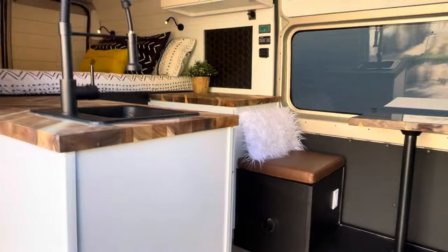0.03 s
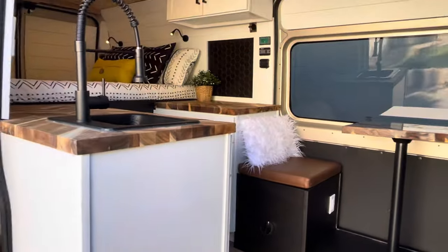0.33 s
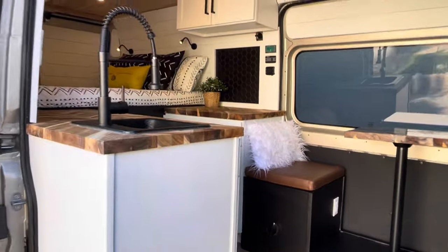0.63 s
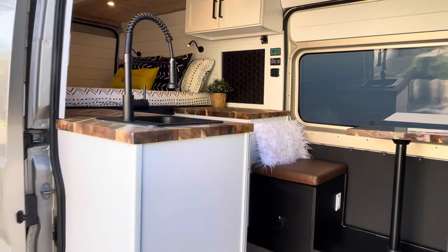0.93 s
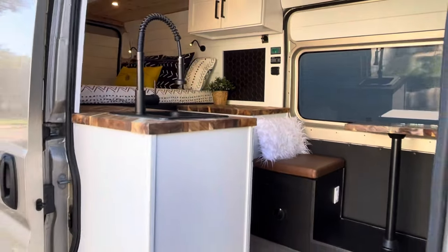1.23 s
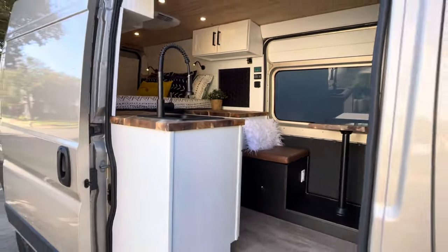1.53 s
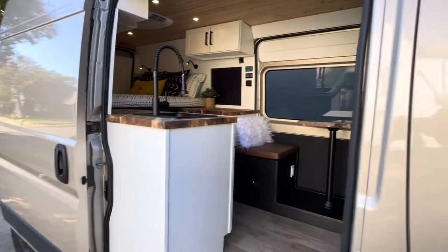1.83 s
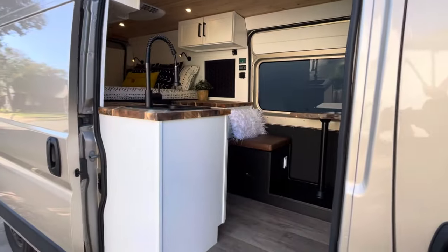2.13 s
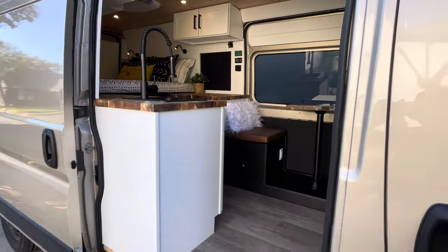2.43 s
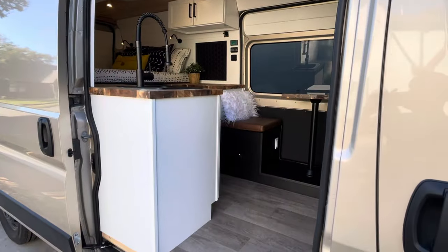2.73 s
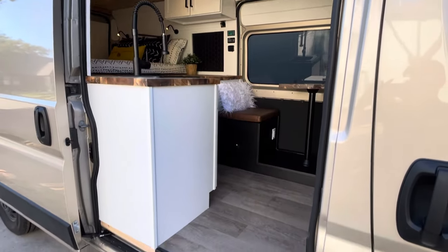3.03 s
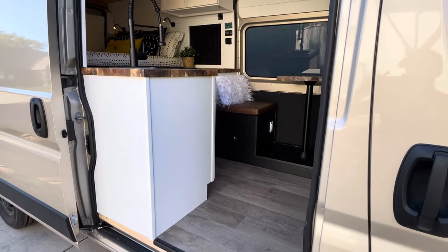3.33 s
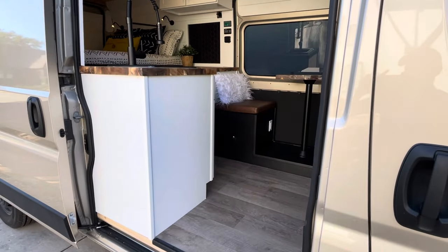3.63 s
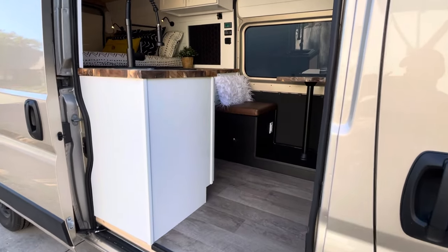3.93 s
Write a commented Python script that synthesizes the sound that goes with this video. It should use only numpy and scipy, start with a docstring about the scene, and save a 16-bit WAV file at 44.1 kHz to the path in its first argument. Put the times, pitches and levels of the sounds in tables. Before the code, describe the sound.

A van's sliding door clunks into its stop, followed by faint ticks and a shoe scuff.

```python
"""Outdoors, over low wind rumble, a wavering drone and far traffic, a van's sliding door runs into its stop.
The catch snaps, the steel door clunks and the van's body booms; the door rebounds with one firm knock,
then a few faint, uneven ones. Then a step back: small dry ticks, rustling cloth, a soft footfall and a
shoe scuffing over grit. Last, a faint hiss swells and fades over the traffic."""
import sys
import numpy as np
from scipy.fft import rfft, irfft, next_fast_len
from scipy.io import wavfile
from scipy.ndimage import map_coordinates

SR = 44100
rng = np.random.default_rng(int(sys.argv[2]) if len(sys.argv) > 2 else 0)


def transcribe(u):
    """Save the signal u as a 16-bit wav file named by the first command-line argument.

    u: samples, shape (n,) or (channels, n), limited to [-1, 1]; the rate is SR.
    q: integer samples, one column per channel.
    """
    v = np.clip(np.atleast_2d(u).T, -1, 1)
    q = np.round(v * 32767).astype(np.int16)
    wavfile.write(sys.argv[1], SR, q)


N = 176400
T = np.arange(N) / SR

# stereo width of the impacts and of the airy sounds: f/Hz, left-right correlation
IMPACT_WIDTH = [(60, .9), (150, 0.92), (300, 1), (640, .3), (1400, -0.04), (3000, 0), (5500, 0),
                (7200, -0.41), (10500, .7)]
AIR_WIDTH = [(60, 0.65), (130, 0.85), (290, 0.61), (640, -0.16), (1400, -.1), (3000, -0.29)]


def amp(db):
    """Decibels to gain."""
    return 10 ** (np.asarray(db) / 20)


def unit(x):
    """Scale to rms 1."""
    return x / np.sqrt(np.mean(x ** 2) + 1e-20)


def along(points, hz):
    """Read (f/Hz, value) points along a log frequency axis."""
    f, v = np.transpose(points)
    return np.interp(np.log(hz + 1), np.log(f + 1), v)


def curves(rows):
    """Automation lanes: one value per sample for each column after the time."""
    times, *columns = np.transpose(rows)
    return [np.interp(T, times, column) for column in columns]


def wobble(rate):
    """A smooth random curve, rate knots a second."""
    return map_coordinates(rng.standard_normal(8192), [T * rate], mode="wrap")


def pan(db):
    """Left and right gains for a level difference; positive leans left."""
    return amp(np.array([np.atleast_1d(db), -np.atleast_1d(db)]) / 2)


def add(out, s, x):
    """Mix x into out from time s."""
    i = max(round(s * SR), 0)
    out[:, i:i + x.shape[-1]] += x[..., :N - i]


def noise(spectrum, width, pan_db, size=N):
    """Coloured stereo noise of rms 1; pan_db is a number or (f/Hz, pan/dB) points."""
    hz = np.fft.rfftfreq(size, 1 / SR)
    angle = np.arccos(np.clip(along(width, hz), -1, 1)) / 2
    coloured = rfft(rng.standard_normal((2, size))) * amp(along(spectrum, hz))
    mid, side = coloured * [np.cos(angle), np.sin(angle)]
    lean = pan(along(pan_db, hz) if np.ndim(pan_db) else pan_db)
    return unit(irfft(np.array([mid + side, mid - side]) * lean, size))


def dying(t, t60, tail_db, tail_t60):
    """A fast first decay over a weaker, longer tail."""
    return np.hypot(amp(-60 * t / t60), amp(tail_db - 60 * t / tail_t60))


def damped(modes, t):
    """Decaying sines that start in phase, in mono."""
    return sum(amp(db - 60 * t / t60) * np.sin(2 * np.pi * hz * t) for hz, db, t60 in modes)


def ring(modes, t, vary_db, spread, tilt_db=0):
    """Damped modes of alternating sign, varied at each strike; spread scatters each ear's phase."""
    out = np.zeros((2, len(t)))
    for k, (hz, db, t60, pan_db) in enumerate(modes):
        chance = rng.standard_normal(3)
        strike_db = db + vary_db * chance[0] + tilt_db * np.log2(hz / 580)  # tilt pivots at 580 Hz
        tone = np.sin(2 * np.pi * hz * t + spread * chance[1:, None])
        out += (-1) ** k * pan(pan_db) * amp(strike_db - 60 * t / t60) * tone
    return out


def outdoors():
    """The bed: wind rumble, a low wavering drone and the wash of far traffic."""
    # swell of wind and traffic: t/s, level/dB
    rumble_level = [(0, -38.5), (1, -46), (2, -47), (2.5, -46.5), (2.9, -48.5), (3.2, -46), (3.5, -46.5),
                    (4, -47)]
    traffic_level = [(0, -51), (.8, -53), (1.5, -51), (2.2, -52), (2.9, -52), (3.5, -52), (4, -52)]
    # their colours: f/Hz, level/dB
    rumble_colour = [(20, -32), (35, -13.5), (55, -3), (75, -2), (105, -2.5), (160, -10), (270, -14.5),
                     (380, -22), (800, -39.5), (2000, -72.5)]
    traffic_colour = [(100, -13.5), (400, -8.5), (600, 0), (800, 2.5), (1100, -0.5), (1600, -8),
                      (2200, -18), (3000, -30), (4000, -36.5), (6500, -40.5), (8300, -43), (10000, -52.5),
                      (12000, -47.5), (14000, -62)]
    # drift of the drone: t/s, f/Hz, level/dB
    drone_drift = [(0, 69.94, -55.5), (.7, 70.52, -40.5), (1.2, 68.87, -42.5), (1.6, 72.47, -45.5),
                   (2.1, 71.06, -47), (2.4, 73.3, -50.5), (2.75, 73.9, -57), (3.5, 73, -48), (4, 69.5, -50)]
    rumble_db, = curves(rumble_level)
    traffic_db, = curves(traffic_level)
    drone_hz, drone_db = curves(drone_drift)
    rumble = amp(rumble_db + 0.37 * wobble(9)) * noise(rumble_colour, AIR_WIDTH, pan_db=3)
    traffic = amp(traffic_db + 0.45 * wobble(11)) * noise(traffic_colour, AIR_WIDTH, pan_db=1)
    drone_gain = amp(drone_db + 3.965 * wobble(12))
    drone = drone_gain * np.sin(2 * np.pi * np.cumsum(drone_hz + 2.5 * wobble(12)) / SR)
    return rumble + traffic + drone * pan(db=1.6)


def door():
    """Each blow rings panel, catch and latch tongue, and stirs the same dense resonances of the door."""
    # blows: t/s, rise/s, noise decay stretch, panel/dB, panel tilt/(dB per octave),
    # thud/dB, clatter/dB, jingle/dB, crack/dB
    blows = [(0.0, 0.00058, 2.1, -33.5, 7.5, -27, -37, -45.5, -74),
             (0.0572, 0.0026, 0.8, -20, 4, -22.5, -20.5, -23, -11.5),
             (0.083, 0.0042, 2.3, -28, 1, -30, -27, -33.5, -57),
             (0.107, 0.0031, 1.27, -10, 0, -23, -24, -29, -28),
             (0.1149, .002, 0.77, -33, 2.5, -20.5, -18, -26, -38.5),
             (0.131, .003, 1.63, -23.5, 0, -20, -27.5, -39.5, -67),
             (0.198, 0.0022, 1.3, -34, 1, -37, -39.5, -35.5, -50),
             (0.205, 0.0017, 1.2, -56, 5, -39, -39.5, -34.5, -57),
             (0.2634, 0.001, 0.74, -17.5, -1.5, -23, -24, -32.5, -36.5),
             (0.277, 0.0084, .9, -28.5, -4.5, -16.5, -28, -50, -72),
             (0.33, 0.0028, 1.8, -44, -1, -36, -42.5, -72, -76.5),
             (0.4643, 0.005, 1.06, -51.5, 14, -41, -34, -48.5, -84),
             (0.474, 0.0042, 0.94, -51.5, -11, -34, -43.5, -62, -85),
             (0.564, 0.0039, 0.81, -70, 8, -58, -46.5, -81, -69),
             (0.676, 0.004, 1.45, -53.5, 9, -44, -48, -75, -86)]
    # modes of the door panel, the catch and the pinging latch tongue: f/Hz, level/dB, t60/s, pan/dB
    panel_modes = [(190.5, -16, 0.4, -0.5), (253.5, -13, 0.27, 2.5), (310.4, -12.5, 0.11, 2.5),
                   (372.6, -21, 0.31, 3.5), (418.5, -16.5, 0.27, 7), (461.9, -5, 0.18, 9.5),
                   (522.4, -18.5, 0.202, 7.5), (613, -7, 0.098, 10), (650.3, -7.5, 0.2, 10.5),
                   (696, 0, .08, 11), (765, -20, 0.14, 5.5), (798, -15, 0.15, 5.5), (848, -18.5, .26, 6),
                   (942, -20.5, 0.31, -4), (1078, -23, 0.24, 5.5), (1213, -21, .25, 8),
                   (1292, -21, 0.31, 6.5), (1477, -22.5, 0.25, 1.5), (1645, -25.5, 0.27, 3.5)]
    catch_modes = [(1995, -6.5, .12, -1.5), (2430, -18, 0.24, -3), (2820, -15, .1, -6),
                   (3060, -23.5, .3, -3), (4250, -18.5, 0.18, 7.5), (4540, -21.5, 0.13, 6),
                   (5460, -25.5, .2, 4), (5890, -11, 0.091, 11), (6466, -24, 0.0902, 5),
                   (6820, -22.5, 0.07, -3.5)]
    tongue_modes = [(10200, -19, 0.064, -2), (10630, -20, 0.05, 0), (10900, -23.5, 0.12, 0.5),
                    (12110, -24, .09, -0.5)]
    # colours of the hollow thud, the clatter, the catch's jingle and the crack: f/Hz, level/dB
    thud = [(60, -26.5), (130, -10.5), (200, -9.5), (290, -3), (420, -5), (560, -11), (900, -14.5),
            (2500, -62.5)]
    clatter = [(250, -28), (550, -8), (850, 1), (1250, -2), (1800, -4.5), (2300, -10), (3200, -21.5),
               (7000, -55)]
    jingle = [(1000, -30), (2000, -1.5), (3000, 5.5), (4400, 5), (5200, 0.5), (7000, -6), (7700, -29.5),
              (9300, -35.5), (11000, -22.5), (16000, -58)]
    crack = [(1500, -22), (4000, -16.5), (7000, 9), (8800, -8), (10200, 3), (12000, 1), (14000, -14),
             (16000, -29.5)]
    # stereo placement of those noises: f/Hz, pan/dB
    placement = [(60, 1.5), (200, -1.5), (400, 6), (700, 7.5), (1290, 3.5), (2400, -4), (4400, 6.5),
                 (6500, 8.5), (9000, -0.5)]
    out, size = np.zeros((2, N)), 32768
    t, hz = T[:size], np.fft.rfftfreq(size, 1 / SR)
    ripple_db = 3.5 * np.minimum(hz / 3000, 1)  # dense resonances, deepest from 3 kHz up
    ripple = amp(ripple_db * map_coordinates(rng.standard_normal(512), [hz / 60]))  # knots 60 Hz apart
    for s, rise, stretch, panel_db, tilt_db, thud_db, clatter_db, jingle_db, crack_db in blows:
        blow = amp(panel_db) * ring(panel_modes, t, vary_db=2, spread=0.61, tilt_db=tilt_db)
        blow *= amp(0.8 * wobble(260)[:size])  # loose fittings roughen the panel's ring
        blow += amp(jingle_db) * ring(catch_modes, t, vary_db=0.5, spread=1.5)
        blow += amp(crack_db) * ring(tongue_modes, t, vary_db=3.5, spread=0.99)
        layers = [(thud, thud_db, (0.14, -14, 0.43)), (clatter, clatter_db, (0.12, -14.5, 0.21)),
                  (jingle, jingle_db, (0.088, -16, 0.35)), (crack, crack_db, (0.035, -24, 0.22))]
        for colour, db, decay in layers:
            burst = noise(colour, IMPACT_WIDTH, placement, size)
            resonant = unit(irfft(rfft(burst) * ripple))
            blow += amp(db) * dying(t / stretch, *decay) * resonant
        add(out, s, blow * np.minimum(t / rise, 1))
    return out


def door_stop():
    """The steel stop rings under the hard blows; later the door settles against it with hollow knocks."""
    # square hits on the stop, and the settling knocks: t/s, level/dB
    hits = [(0.0595, -30), (0.115, -32.5), (0.2645, -34)]
    knocks = [(0.471, -31.5), (0.533, -50), (0.686, -44)]
    # modes of the steel stop and of the hollow door: f/Hz, level/dB, t60/s, pan/dB
    steel_modes = [(2196, -2.5, 0.08, 0), (2316, 0.5, 0.084, -3), (3060, -4, .16, -4.5),
                   (3219, -9, 0.19, -2), (3370, -8, 0.061, 1.5), (4040, -15.5, .22, 4), (4200, -9.5, .2, 3),
                   (4510, -10, 0.15, 5.5)]
    hollow_modes = [(256, 1, 0.1, 3), (385, -3, 0.22, 7.5), (445, -8, 0.13, 4), (830, -17, .15, 6),
                    (1200, -2.5, 0.058, 2), (1483, -9, .07, -1), (1936, -15.5, 0.074, 3)]
    out, t = np.zeros((2, N)), T[:SR // 2]
    for s, db in hits:
        add(out, s, amp(db) * ring(steel_modes, t, vary_db=0.5, spread=1))
    attack = np.minimum(t / 0.003, 1)
    for s, db in knocks:
        add(out, s, amp(db) * ring(hollow_modes, t, vary_db=1.6, spread=0.64) * attack)
    return out


def body_boom():
    """The van's body sways and booms after the heavy blows."""
    # shoves on the body: t/s, level/dB
    shoves = [(0.06, -31), (0.113, -20.5), (0.291, -24), (0.336, -39), (0.468, -42)]
    # its low modes: f/Hz, level/dB, t60/s
    body_modes = [(40, -4.5, .45), (64.5, -1, 0.49), (89.7, -8.5, .35), (111.8, -7, 0.4),
                  (141.8, -5.5, 0.35)]
    out, t = np.zeros((2, N)), T[:SR]
    bloom = 1 - np.exp(-t / 0.013)
    boom = damped(body_modes, t) * bloom
    for s, db in shoves:
        add(out, s, amp(db) * boom)
    return out * pan(db=2)


def ticks():
    """Small dry ticks: a few woody cycles and a bright snap."""
    # ticks: t/s, woody ring/dB, snap/dB, snap tilt/(dB per octave)
    cues = [(.345, -60, -52, 4.5), (0.7905, -99, -73, 0), (.812, -71, -54.5, 3.5), (0.9427, -64, -46.5, 3),
            (1.132, -57, -43.5, -2), (1.1437, -40, -43.5, 2), (1.1823, -39.5, -53, 3),
            (1.2944, -35.5, -51, -1), (1.3896, -28, -38, -4.5), (1.4785, -27, -37.5, -1),
            (1.485, -52, -56, 0.5), (1.565, -35.5, -44, 0.5), (1.5895, -33, -38, -2),
            (1.6112, -34, -38, -3.5), (1.6283, -36.5, -39.5, 6.5), (1.634, -55, -47.5, 6.5)]
    # woody ring: f/Hz, level/dB, t60/s
    woody_modes = [(1247, 3, 0.012), (1394, -8.5, 0.011), (2020, -17.5, .014)]
    # colour of the snap: f/Hz, level/dB
    snap_colour = [(800, -2), (2000, 16), (3000, 1), (4600, 4), (5700, -2), (8300, -7), (9800, -17.5),
                   (12300, -6.5), (14000, -26), (16000, -23)]
    out, t = np.zeros((2, N)), T[:SR // 4]
    woody = damped(woody_modes, t) * np.minimum(t / 0.0011, 1) * pan(db=7)
    snap_decay = dying(t, t60=0.0165, tail_db=-11.5, tail_t60=0.11)
    attack = np.minimum(t / 0.0006, 1)
    for s, ring_db, snap_db, tilt_db in cues:
        tilted = [(hz, db + tilt_db * np.log2(hz / 4000)) for hz, db in snap_colour]
        snap = snap_decay * noise(tilted, IMPACT_WIDTH, pan_db=2, size=len(t))
        add(out, s, (amp(ring_db) * woody + amp(snap_db) * snap) * attack)
    return out


def clothing():
    """Moving clothes give a faint grainy rustle."""
    # swell of the rustle: t/s, level/dB
    rustle_level = [(0, -75), (.7, -85.5), (.83, -74.5), (.92, -77), (.96, -68), (1.05, -79), (1.14, -66),
                    (1.25, -81), (1.33, -73), (1.45, -78), (1.65, -72), (1.73, -75), (1.82, -57),
                    (1.95, -84), (4, -100)]
    # colour of the cloth: f/Hz, level/dB
    cloth_colour = [(1500, -7.5), (3000, 3.5), (4500, 3.5), (5600, -4.5), (6800, -4), (9300, -19),
                    (12000, 0), (14000, -21.5), (16000, -25)]
    level_db, = curves(rustle_level)
    grain = amp(2.7 * wobble(45) + 3 * wobble(600))
    return amp(level_db) * unit(grain * noise(cloth_colour, AIR_WIDTH, pan_db=3.5))


def cloth_brushes():
    """Short grainy swishes of cloth, each in its own band."""
    # light brushes: peak t/s, half length/s, level/dB, centre f/Hz
    brushes = [(0.837, .02, -71, 6040), (.9, 0.021, -76.5, 6330), (2.87, 0.075, -76.5, 2740),
               (3.36, .09, -77.5, 3100), (3.691, 0.033, -80, 3800)]
    out = np.zeros((2, N))
    hz, half_band_octaves = np.geomspace(500, 16000, 40), 0.32
    for s, half_length, db, centre_hz in brushes:
        band_db = -20 * np.log10(1 + (np.log2(hz / centre_hz) / half_band_octaves) ** 2)
        grain = amp(4.5 * wobble(280))
        swish = unit(grain * noise(np.transpose([hz, band_db]), AIR_WIDTH, pan_db=5))
        out += amp(db) * np.exp(-((T - s) / half_length) ** 2) * swish
    return out


def footfall():
    """A soft step: a low thump whose pitch sags quickly to its resting value."""
    out, t = np.zeros((2, N)), T[:SR // 2]
    start_hz, rest_hz, sag_s = 684, 81.7, 0.0033
    level_db, rise_s, t60 = -26.5, 0.016, 0.21
    hz = rest_hz + (start_hz - rest_hz) * np.exp(-t / sag_s)
    envelope = amp(level_db - 60 * t / t60) * np.sqrt(np.minimum(t / rise_s, 1))
    add(out, s=1.146, x=envelope * np.sin(2 * np.pi * np.cumsum(hz) / SR))
    return out


def shoe_scuffs():
    """A sole scuffs over grit, a little to the left: a low rub under a grainy hiss."""
    # scuffs: peak t/s, rise/s, fall/s, sole/dB, grit/dB
    scuffs = [(1.425, 0.033, 0.026, -47.5, -70), (1.816, 0.027, 0.017, -39, -49),
              (1.837, 0.0048, 0.015, -39, -34.5)]
    # colours of sole and grit: f/Hz, level/dB
    sole_colour = [(250, -24), (480, -6), (620, 3), (820, -0.5), (1200, -4), (2000, -30), (4000, -75)]
    grit_colour = [(400, -25.5), (800, -2), (1200, -8), (1600, 1.5), (2050, 5), (2900, -11), (4600, -8),
                   (5800, -21.5), (8400, -17.5), (9800, -41), (12300, -27), (15500, -51)]
    out = np.zeros((2, N))
    sole = noise(sole_colour, AIR_WIDTH, pan_db=4)
    grit = unit(amp(1.2 * wobble(570)) * noise(grit_colour, AIR_WIDTH, pan_db=4))
    for s, rise, fall, sole_db, grit_db in scuffs:
        envelope = np.exp(-np.maximum((s - T) / rise, (T - s) / fall))
        out += envelope * (amp(sole_db) * sole + amp(grit_db) * grit)
    return out


def far_hiss():
    """A faint hiss that swells and fades over the traffic."""
    # swell of the hiss: t/s, level/dB
    hiss_level = [(0, -82), (2.2, -81.5), (2.42, -78), (2.6, -71), (2.73, -80.5), (2.87, -69), (3.1, -85.5),
                  (3.35, -75.5), (3.55, -85), (3.68, -78), (3.8, -85), (4, -89)]
    # its colour: f/Hz, level/dB
    hiss_colour = [(1200, -12.5), (2200, 4.5), (2800, 4.5), (3600, -17.5), (5500, -18), (9000, -29),
                   (16000, -46)]
    level_db, = curves(hiss_level)
    return amp(level_db) * noise(hiss_colour, AIR_WIDTH, pan_db=-3.5)


def scene():
    """The van's door, the step back and the air outside."""
    van = door() + door_stop() + body_boom()
    foley = ticks() + footfall() + shoe_scuffs() + clothing() + cloth_brushes()
    return van + foley + outdoors() + far_hiss()


def record(dry):
    """Soft-clip the loudest peaks and cut the very top of the treble."""
    ceiling, top_hz = 0.8, 15900
    rounded = dry / (1 + (dry / ceiling) ** 6) ** (1 / 6)
    size = next_fast_len(N + SR // 2)
    passband = np.fft.rfftfreq(size, 1 / SR) < top_hz
    return irfft(rfft(rounded, size) * passband, size)[:, :N]


dry = scene()
out = record(dry)
transcribe(out)
```